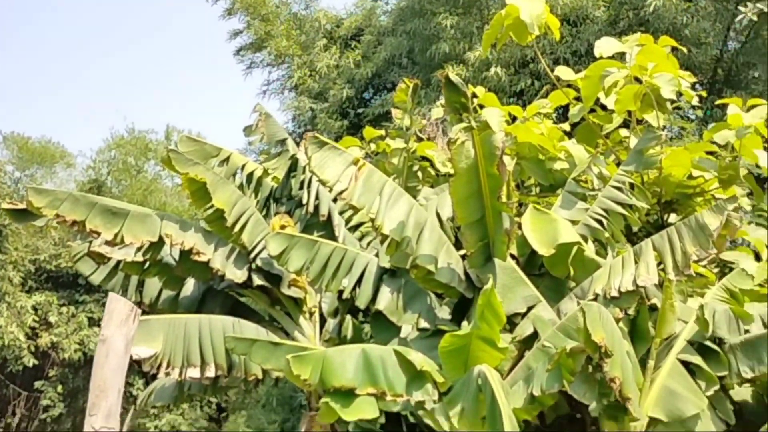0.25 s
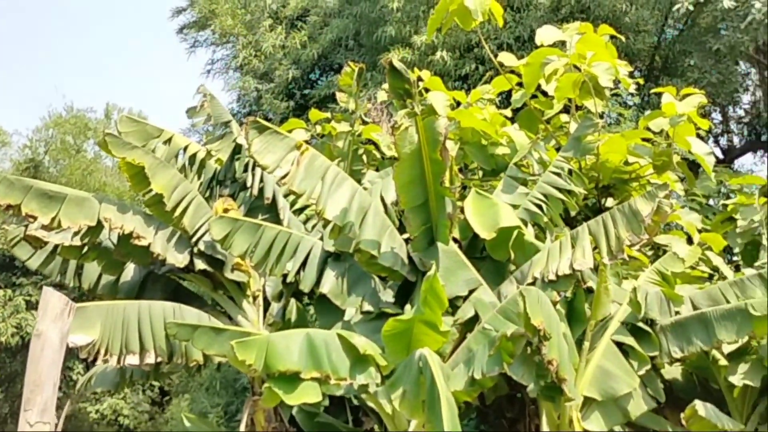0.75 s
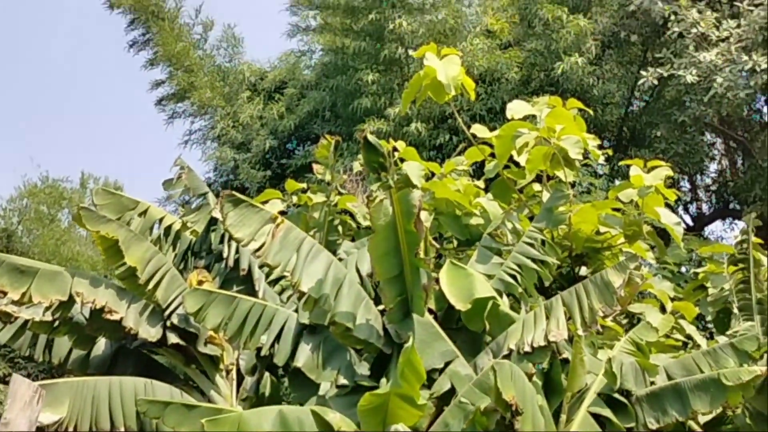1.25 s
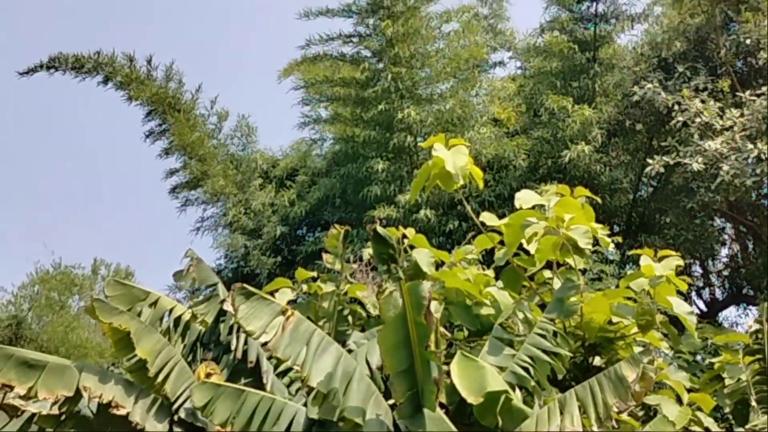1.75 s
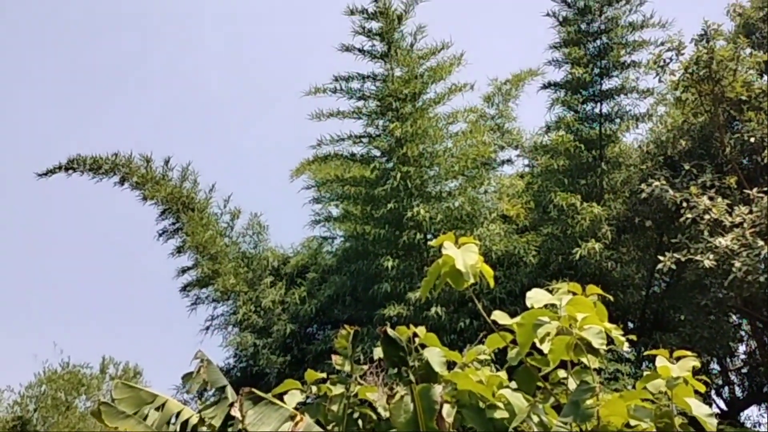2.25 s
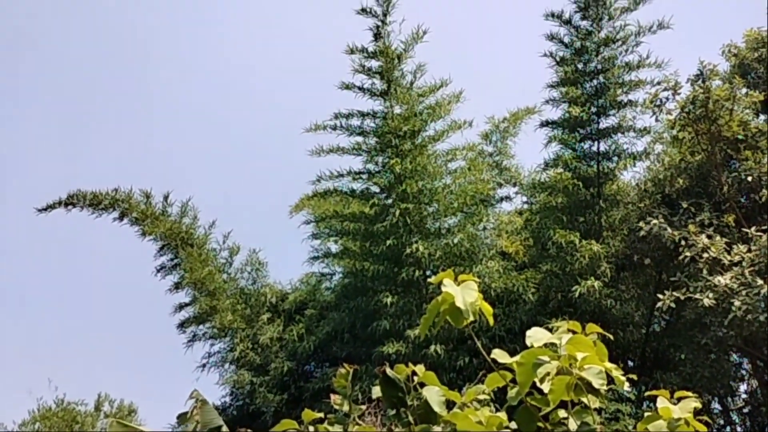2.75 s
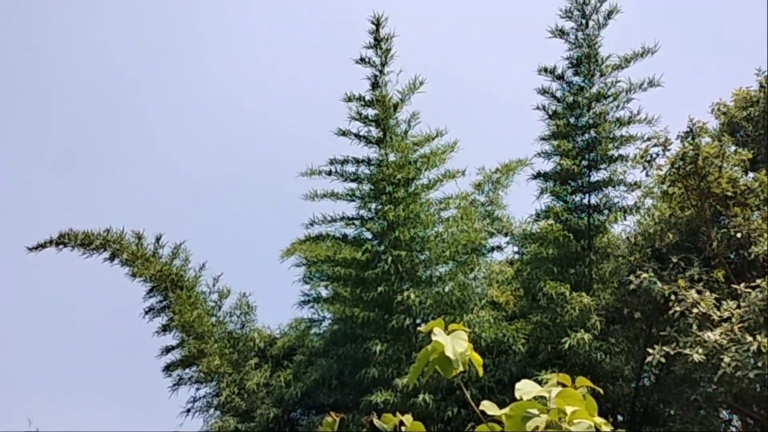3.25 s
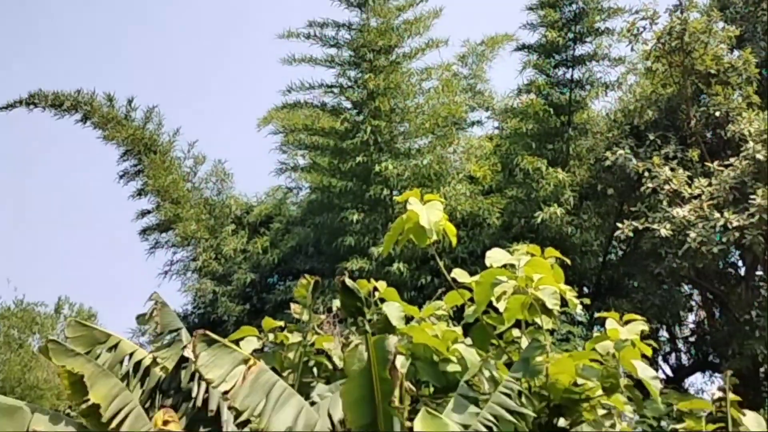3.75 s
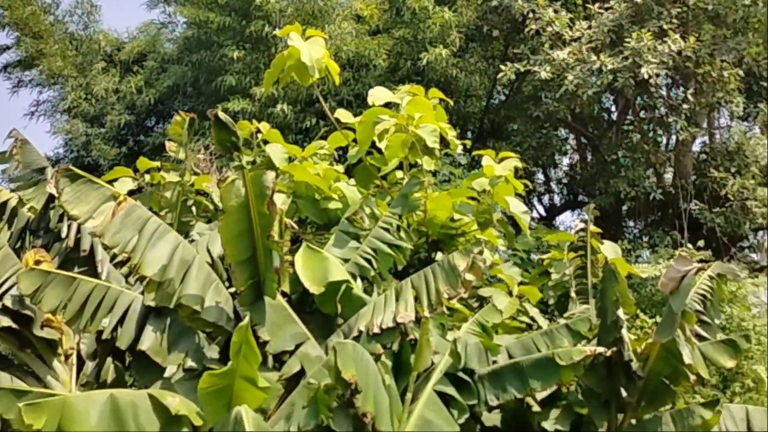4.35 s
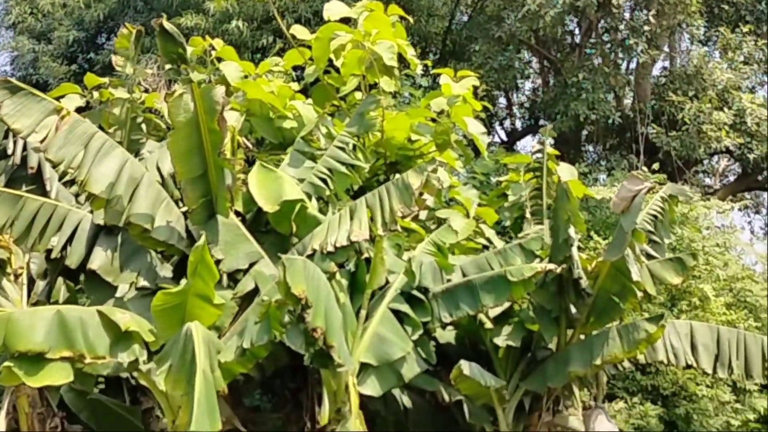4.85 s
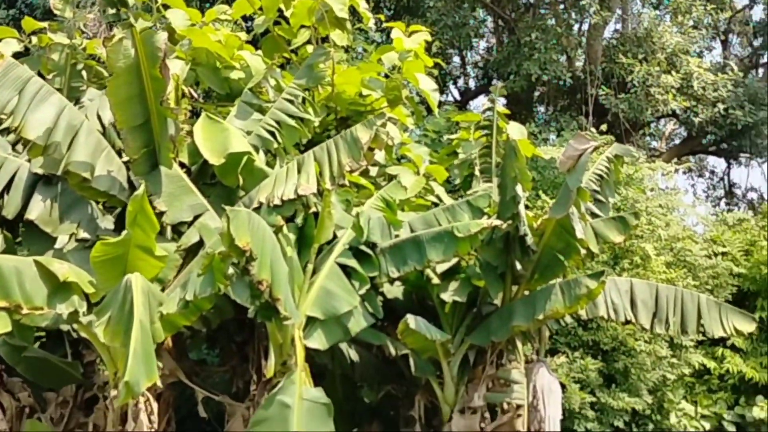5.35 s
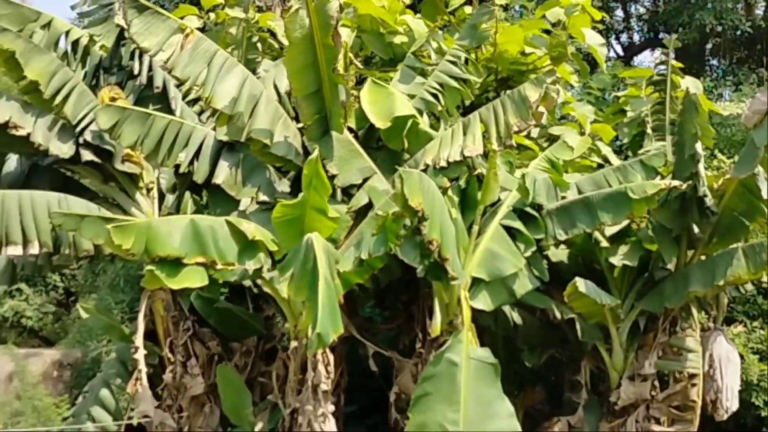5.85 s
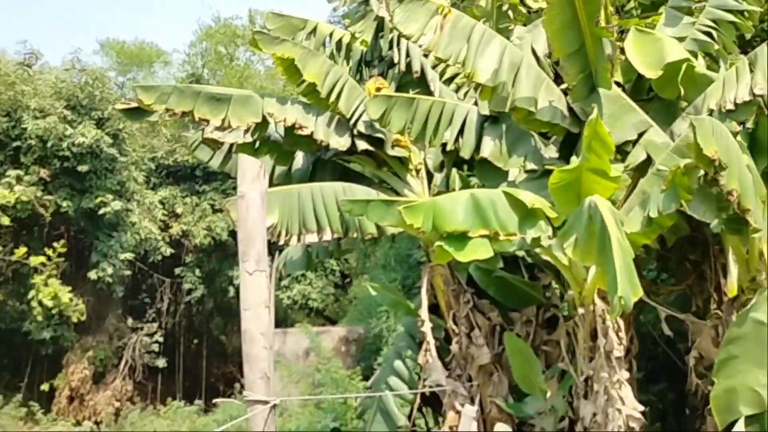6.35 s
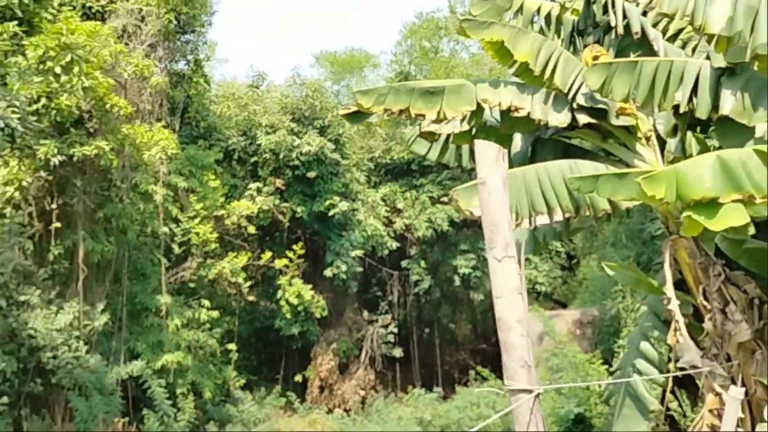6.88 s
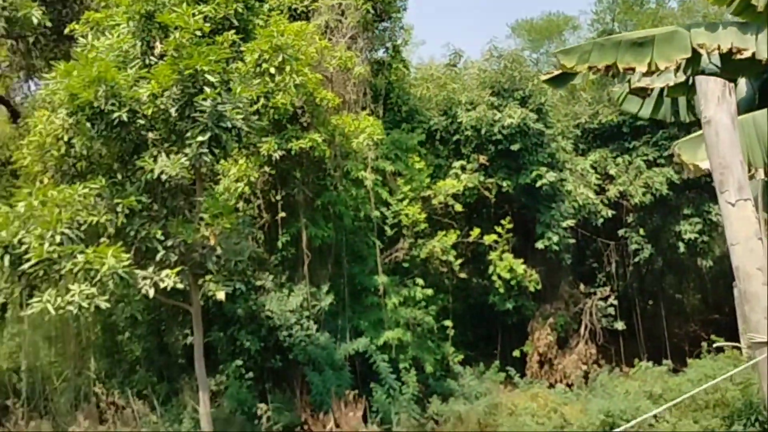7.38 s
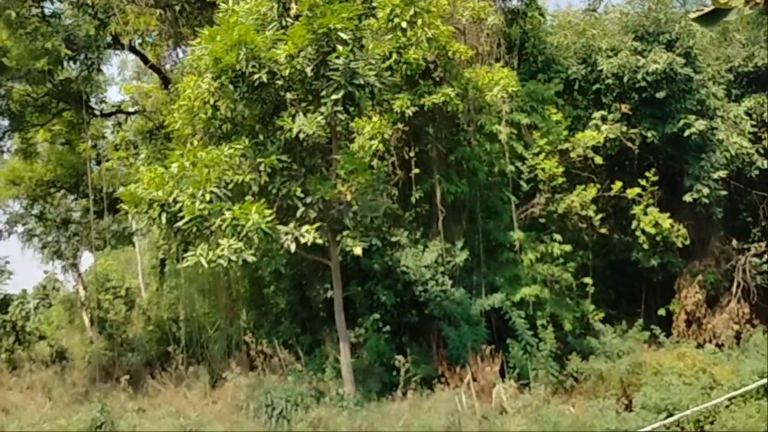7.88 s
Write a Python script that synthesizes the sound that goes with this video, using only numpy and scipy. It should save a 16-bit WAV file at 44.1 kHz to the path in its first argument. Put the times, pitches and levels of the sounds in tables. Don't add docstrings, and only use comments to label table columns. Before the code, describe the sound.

Outdoors beside banana plants and tall trees, near cicadas sing without pause in a dense, shrill buzz that swells slightly and thins. Behind it lie a smooth high insect hiss, faint breeze in leaves and a low distant hum. Crows caw far away with blurred echoes, little birds chirp, and late on a few dry cracks and a faint rising low are heard by a single microphone.

```python
import sys
import numpy as np
from scipy import signal
from scipy.fft import rfft, irfft, next_fast_len
from scipy.io import wavfile
from scipy.ndimage import map_coordinates

SR = 44100
rng = np.random.default_rng(int(sys.argv[2]) if len(sys.argv) > 2 else 0)


def generate_wav(sig):
    pcm = np.round(np.clip(np.atleast_2d(sig).T, -1, 1) * 32767).astype(np.int16)
    wavfile.write(sys.argv[1], SR, pcm)


def gain_from_decibels(decibels):
    exponent = np.asarray(decibels, float) / 20
    return 10 ** exponent


N = 358091

# [t/s, stroke rate/Hz]
STROKE_RATE = [(0, 75.1), (1, 75.05), (2.1, 74.94), (3, 74.8), (3.7, 74.87), (4.5, 74.75), (6, 74.82),
               (6.9, 74.53), (8.2, 74.48)]


def rms_one(x):
    return x / np.sqrt(np.mean(x ** 2) + 1e-20)


def drift(rate):
    r = np.exp(-80 * np.pi * rate / SR)
    noise = rng.standard_normal(N // 40 + 2002)
    slow = signal.lfilter([1], [1, -2 * r, r * r], noise)[2000:]
    return np.interp(np.arange(N) / 40, np.arange(len(slow)), rms_one(slow))


def coloured(x, spectrum, level_db, controls, follows, patchy_db):
    size = next_fast_len(N)
    log_hz = np.log(np.arange(size // 2 + 1) * SR / size + 1)
    points = np.array(spectrum)
    shaped = rfft(x, size) * gain_from_decibels(np.interp(log_hz, np.log(points[:, 0]), points[:, 1]))
    scale = gain_from_decibels(level_db) / np.std(irfft(shaped, size)[:N])

    s, *columns = np.transpose(controls)
    swings = np.array([np.interp(np.arange(N) / SR, s, c) for c in columns])
    swings = swings - swings.mean(axis=1, keepdims=True)

    out = np.zeros(N)
    centres = np.array(follows)[:, 0]
    for share, (_, *pull) in zip(np.eye(len(centres)), follows):
        region = irfft(shaped * np.interp(log_hz, np.log(centres), share), size)[:N]
        out += region * gain_from_decibels(pull @ swings + patchy_db * drift(14.5))
    return scale * out


def stroke_count():
    s, per_s = np.transpose(STROKE_RATE)
    return np.cumsum(np.interp(np.arange(N) / SR, s, per_s)) / SR


def buckles(memory, fresh_db):
    size = 588
    settle = .176
    place = size * stroke_count()
    fresh = rng.standard_normal((int(place[-1] / size) + 40, size))
    turn = 2 * np.pi * np.arange(size) / size
    fresh = fresh * (1 + .3 * np.cos(5 * turn) + .3 * np.cos(6 * turn))
    kept = signal.lfilter([np.sqrt(1 - memory ** 2)], [1, -memory], fresh, axis=0).ravel()
    late = np.roll(fresh.ravel(), round((settle - 1) * size))
    return map_coordinates(kept - gain_from_decibels(fresh_db) * late, [place + 30 * size], order=3)


def foliage(x, t60, count):
    tail = np.arange(SR // 20) / SR
    echoes = rng.standard_normal((count, len(tail))) * gain_from_decibels(-60 * tail / t60)
    turn = np.linspace(0, count - 1, N)
    out = np.zeros(N)
    for k, echo in enumerate(echoes):
        blend = np.cos(np.pi / 2 * np.clip(turn - k, -1, 1))
        out += blend * rms_one(signal.fftconvolve(x, echo)[:N])
    return out


def lines(rough, flicker_db):
    # [t/s, length/s, multiple of the stroke rate, level/dB]
    standing = [(-.3, 1, 60.1, -46), (-.3, 1, 61.25, -46), (-.3, 1.6, 58.2, -47), (-.3, 2.8, 59, -43),
                (-.3, 1.6, 63.95, -47.5), (-.3, 1.9, 65, -43.5), (-.3, 1.6, 67.1, -54),
                (.55, 1.55, 61.85, -43.5), (1.13, 2.95, 61.08, -44.5), (1.18, 1.15, 68, -52),
                (1.5, 4.2, 59.97, -46), (1.57, 3, 65, -47), (1.76, 2.35, 67.2, -49),
                (2.57, 1.75, 58.55, -49), (2.6, 1.85, 63.95, -48), (3.2, 1, 59, -49.5),
                (4.3, 1, 62.25, -47), (4.36, 1.35, 66.05, -50), (4.5, 1.9, 61.3, -45),
                (4.9, 2.3, 59.2, -47.5), (5, 1, 64.05, -51), (5.57, 1, 65, -47.5), (6.24, 2.15, 60, -43),
                (6.3, 2, 59, -45), (6.6, 1.7, 71, -51.5), (6.9, 1.05, 64, -48), (7.14, 1.25, 66, -46.5),
                (7.28, 1.1, 65, -47), (7.35, 1, 65.45, -48), (7.45, .8, 66.75, -48)]
    # [multiple of the stroke rate, level/dB]
    flanks = [(47, -77), (48, -73), (55, -61.5), (71, -60), (72.05, -61), (73.05, -63), (76, -65),
              (77, -66)]
    t = np.arange(N) / SR
    turn = 2 * np.pi * stroke_count()
    shake = 1 - rough + rough * (drift(5) + 1j * drift(5))
    out = np.zeros(N)
    for (start, length, multiple, db), shift in zip(standing, rng.integers(0, N, len(standing))):
        at = np.arange(max(round(start * SR), 0), min(round((start + length) * SR), N))
        fade = np.clip(3 * np.sin(np.pi * (t[at] - start) / length), 0, 1)
        tone = np.imag(shake[(at + shift) % N] * np.exp(1j * (multiple * turn[at] + shift)))
        out[at] += gain_from_decibels(db) * fade * rms_one(tone)
    for multiple, db in flanks:
        level = gain_from_decibels(db + 1 + flicker_db * drift(.4))
        out += level * np.sin(multiple * turn + .4 * drift(5))
    return out


def cicadas():
    # [f/Hz, density/dB per Hz]
    body = [(1880, -71.5), (3200, -53), (3360, -46), (3530, -27.5), (3800, -24), (3930, -24), (4180, -12),
            (4270, -8), (4330, -4.5), (4530, 3), (4960, -2.5), (5260, -11), (5900, -21), (6210, -52),
            (6600, -28.5), (8580, -53.5), (14500, -120)]
    # [t/s, level/dB, turn towards the brighter side/dB]
    drone = [(0, -34, -1), (.4, -32, -1.5), (.65, -33.5, 0), (.9, -30.5, 0), (1.15, -33.5, -0.5),
             (1.5, -32.5, -0.5), (1.8, -31, -1), (1.95, -35, 2), (2.4, -35, 0), (3.4, -36.5, 0.5),
             (4.2, -35, -0.5), (4.7, -33.5, 0.5), (5.35, -38, -1), (5.9, -33.5, 2), (6.35, -34.5, 1),
             (6.85, -33, 2), (7.8, -36, 3.5), (8.12, -35, 4.5)]
    # [f/Hz, share of level, share of turn]
    drone_follows = [(3800, 0.72, -.8), (4500, 1.5, -.6), (5000, 0.68, .6), (5600, .3, 1.2)]
    clear = buckles(memory=.6, fresh_db=-2.5)
    scattered = gain_from_decibels(-9) * foliage(clear, t60=.12, count=5)
    neighbours = gain_from_decibels(3.0) * rng.standard_normal(N)
    steady = gain_from_decibels(.7) * lines(rough=.3, flicker_db=3.5)
    flat = clear + scattered + neighbours
    return coloured(flat, body, -36, drone, drone_follows, patchy_db=-0.47) + steady


def chorus():
    # [f/Hz, density/dB per Hz]
    hiss = [(3530, -38), (6000, -7), (6300, -12.5), (6670, -14), (7060, -10.5), (7740, 1.5), (8200, 2.5),
            (8920, -3.5), (11200, -31), (12900, -33.5), (14900, -21), (15800, -23)]
    # [t/s, clearness/dB]
    clearness = [(0.0, -72.5), (0.04, -72.5), (2.37, -72.5), (3.53, -73), (5.88, -73.5), (6.51, -70.5),
                 (8.12, -71)]
    # [f/Hz, share of clearness]
    chorus_follows = [(8000, .1), (11000, 1.5), (14500, 1.2)]
    return coloured(rng.standard_normal(N), hiss, -48.5, clearness, chorus_follows, patchy_db=0.08)


def field():
    # [f/Hz, density/dB per Hz]
    leaves = [(200, -39), (340, -15.5), (371, -12.5), (409, -6), (641, -6), (834, -1.5), (1190, 0.5),
              (1290, -1), (1400, -0.5), (2010, -7.5), (2370, -12), (2770, -14.5), (2990, -17), (3370, -12),
              (3500, -22.5), (4550, -23), (7700, -120)]
    ground = [(15, -45), (25, -24.5), (92, 2.5), (114, -2), (152, -3.5), (204, -7), (259, -9.5), (340, -12),
              (440, -38), (750, -120)]
    # [t/s, breeze/dB, rustle/dB]
    air = [(0.0, -56, 0), (0.45, -58, -2), (0.88, -54.5, 2), (1.08, -58, 0.5), (2.49, -57.5, 0.5),
           (3.01, -58, 2.5), (3.57, -56.5, 1), (3.93, -59, 0), (4.27, -59.5, 0), (4.68, -62, -1.5),
           (5.11, -60.5, 2), (5.59, -62, -1), (6.22, -63.5, 1), (6.49, -59.5, 0), (6.94, -62, 1.5),
           (7.55, -60.5, -2), (7.69, -59.5, -0.5), (8.12, -59, -2)]
    # [f/Hz, share of breeze, share of rustle]
    air_follows = [(350, 0.66, -.3), (450, 0.18, -1.1), (1200, 1.16, .1), (2400, 0.65, .9)]
    murmur = coloured(rng.standard_normal(N), leaves, -58.5, air, air_follows, patchy_db=1.1)
    rumble = coloured(rng.standard_normal(N), ground, -73, air, air_follows[:2], patchy_db=1.1)
    return murmur + rumble


def motor():
    # [t/s, level/dB]
    hum = [(0, -67), (.3, -77.5), (.7, -71), (2.2, -81), (5.2, -82), (6, -75), (6.6, -83.5), (7.3, -75),
           (8.12, -78)]
    hum_hz = 107.2
    t = np.arange(N) / SR
    db = np.interp(t, *np.transpose(hum))
    hum_db = db + 1.5 + 2.5 * drift(5)
    octave_db = -80 + .3 * (db - db.mean()) + 3.0 * drift(2.2)
    out = np.zeros(N)
    for k, level in enumerate([hum_db, octave_db], start=1):
        out += gain_from_decibels(level) * np.sin(2 * np.pi * k * hum_hz * t + 1.3 / k * drift(3.6))
    return out


def calls(rows, rasp_hz, edge, echo_db):
    out = np.zeros(N)
    low_pass = signal.butter(2, rasp_hz, fs=SR, output="sos")
    rasp = rms_one(signal.sosfilt(low_pass, rng.standard_normal((2, N))))
    for (s, length, start_hz, end_hz, db, rough), shift in zip(rows, rng.integers(0, N, len(rows))):
        at = np.arange(max(round(s * SR), 0), min(round((s + length) * SR), N))
        u = np.clip((at / SR - s) / length, 0, 1)
        phase = 2 * np.pi * np.cumsum(start_hz + (end_hz - start_hz) * u) / SR
        rough = np.clip(rough, 0, 1)
        even, odd = rasp[:, (at + shift) % N]
        tone = (1 - rough + rough * even) * np.sin(phase) + rough * odd * np.cos(phase)
        out[at] += gain_from_decibels(db) * np.minimum(edge * np.sin(np.pi * u), 1) * rms_one(tone)
    tail = np.arange(SR // 2) / SR
    trees = rng.standard_normal(len(tail)) * gain_from_decibels(-60 * tail / 0.54)
    return out + gain_from_decibels(echo_db) * signal.fftconvolve(out, trees / np.linalg.norm(trees))[:N]


def birds():
    # [t/s, length/s, start f/Hz, end f/Hz, level/dB]
    chirps = [(-.04, 0.11, 2950, 2830, -60), (1.87, .073, 2720, 2860, -68), (1.97, .039, 2560, 2590, -63),
              (1.98, 0.075, 2800, 2920, -61), (2.03, 0.053, 2700, 2580, -61),
              (3.04, 0.051, 2170, 2150, -62.5), (3.215, .045, 2630, 2690, -63),
              (3.27, .055, 2560, 2594, -63), (3.33, 0.091, 3000, 3340, -70),
              (3.46, 0.077, 3010, 2920, -64.5), (4.73, 0.048, 3430, 3280, -68),
              (5.21, .07, 2670, 2630, -74), (6.645, 0.11, 2910, 2850, -64), (6.66, .03, 3750, 3280, -66),
              (7.025, .03, 2450, 2750, -68), (7.045, .075, 2750, 2710, -64), (7.1, .03, 2850, 3200, -69),
              (7.12, .12, 2720, 2750, -72), (7.25, .035, 2900, 3100, -71), (7.58, .05, 2150, 2050, -69),
              (7.98, 0.09, 2650, 2670, -74)]
    return calls([(*row, .3) for row in chirps], rasp_hz=100, edge=1.1, echo_db=-4)


def crows():
    # [t/s, length/s, f/Hz, level/dB, roughness (0 clear to 1 hoarse)]
    caws = [
        (0.642, 0.094, 1243, -60.5, .8),
        (0.808, 0.29, 1400, -57.5, 3),
        (1.14, 0.057, 1264, -59, 1),
        (2.889, 0.16, 1255, -54.5, 2.5),
        (3.435, .1, 1260, -51, .2),
        (4.136, 0.12, 1300, -54.5, .3),
        (4.165, 0.072, 1225, -54.5, .3),
        (4.197, 0.084, 1990, -71, .99),
        (5.089, 0.12, 1383, -65, 0.1),
        (5.22, 0.065, 1376, -61.5, -0.8),
    ]
    sag = .015
    rows = [(s, length, hz, hz * (1 - sag), db, rough) for s, length, hz, db, rough in caws]
    return calls(rows, rasp_hz=80, edge=1.5, echo_db=-8)


def crickets():
    # [t/s, length/s, start f/Hz, end f/Hz, level/dB]
    held = [
        (2.2, 1.2, 3142, 3138, -79),
        (2.25, .8, 3212, 3208, -79),
        (7.25, .5, 3130, 3125, -81),
        (3.1, .75, 946, 932, -69),
        (4.3, .87, 980, 978, -72),
        (6.2, .6, 525, 525, -78),
        (7.3, 1, 525, 527, -72),
    ]
    return calls([(*row, .5) for row in held], rasp_hz=14, edge=2, echo_db=-30)


def lowing():
    # [t/s, length/s, start f/Hz, end f/Hz, level/dB]
    drawn = [
        (2.85, .46, 1756, 1746, -64),
        (5.485, 0.25, 300, 519, -70.5),
        (7.499, 0.3, 1140, 1276, -60),
        (7.7, .14, 564, 504, -63),
    ]
    return calls([(*row, .7) for row in drawn], rasp_hz=80, edge=1.5, echo_db=-8)


def ticks():
    # [t/s, f/Hz, ring level/dB, ring t60/s, crack level/dB]
    snaps = [
        (6.316, 1600, -45, .045, -49),
        (6.753, 3200, -54, .008, -45),
        (6.82, 1300, -54, .02, -55),
    ]
    out = np.zeros(N)
    t = np.arange(2000) / SR
    for s, hz, ring_db, t60, crack_db in snaps:
        noise = rng.standard_normal(len(t))
        crack = rms_one(signal.lfilter([1, -1], [1, -1.6, .72], noise)) * gain_from_decibels(-60 * t / .015)
        ring = np.sin(2 * np.pi * hz * t) * gain_from_decibels(-60 * t / t60) * np.minimum(t / .004, 1)
        at = round(s * SR)
        out[at:at + len(t)] += gain_from_decibels(ring_db) * ring + gain_from_decibels(crack_db) * crack
    return out


def scene():
    steady = cicadas() + chorus() + field() + motor()
    animals = birds() + crows() + crickets() + lowing()
    return (steady + animals + ticks())[None]


def band_limit(x):
    return signal.sosfilt(signal.butter(12, 16620, fs=SR, output="sos"), x)


def record(dry):
    low_cut = signal.butter(1, 55, "high", fs=SR, output="sos")
    top_cut = signal.ellip(12, .3, 70, 15560, fs=SR, output="sos")
    mix = signal.sosfilt(np.vstack([low_cut, top_cut]), dry)
    return band_limit(mix)


dry = scene()
out = record(dry)
generate_wav(out)
```